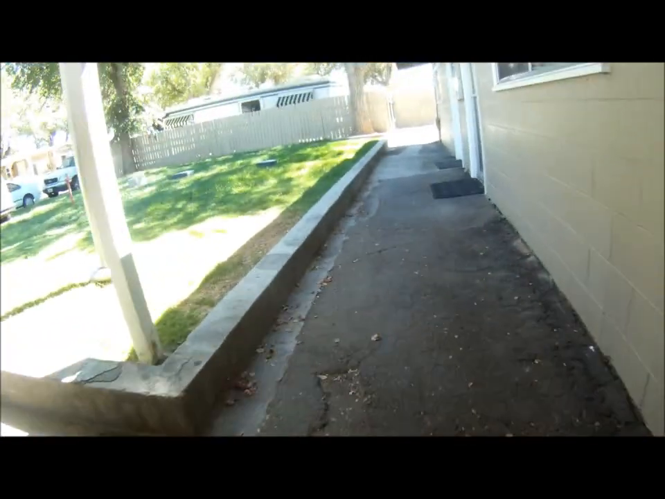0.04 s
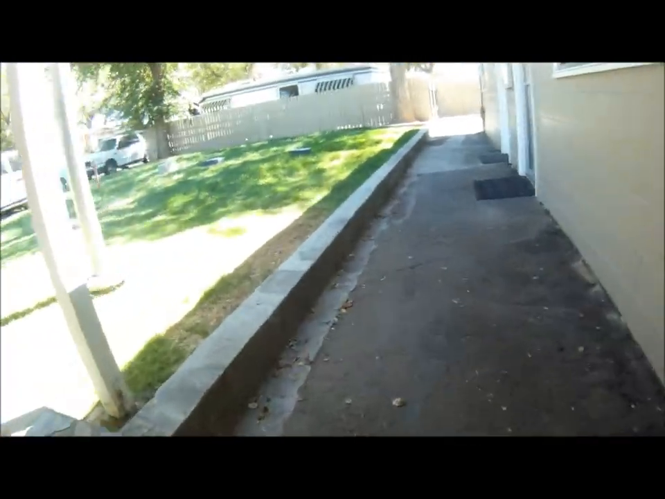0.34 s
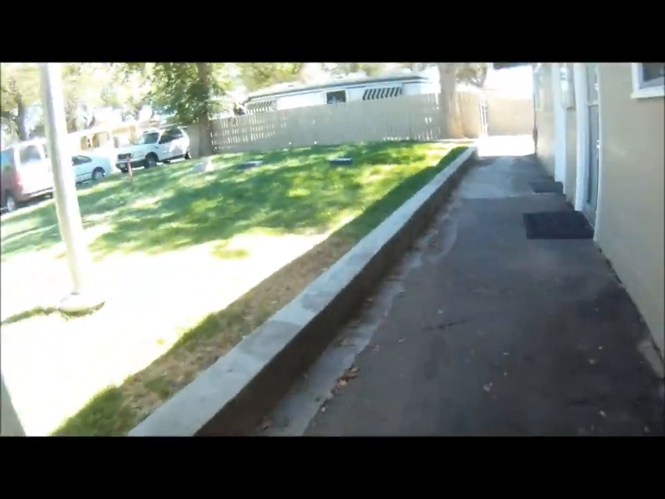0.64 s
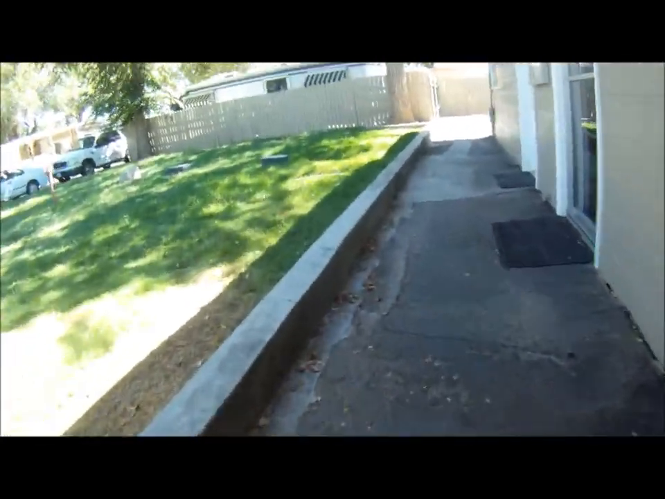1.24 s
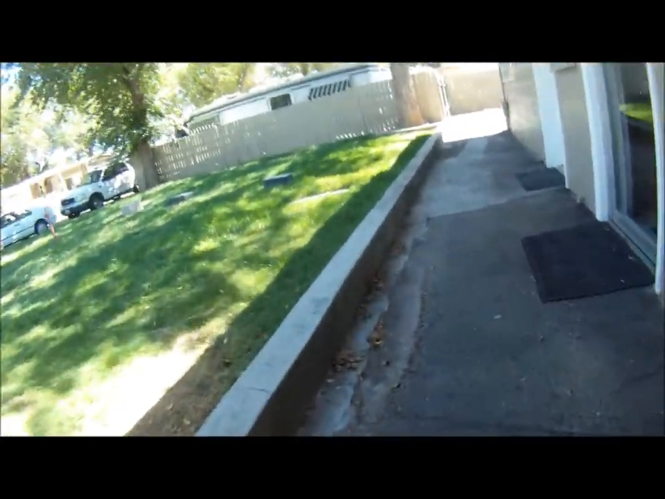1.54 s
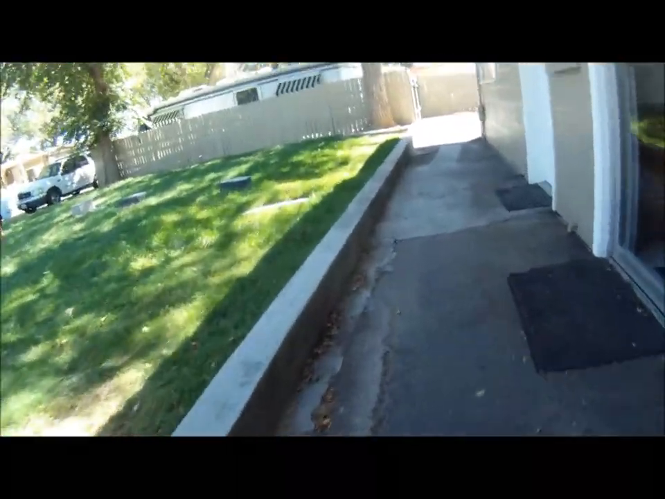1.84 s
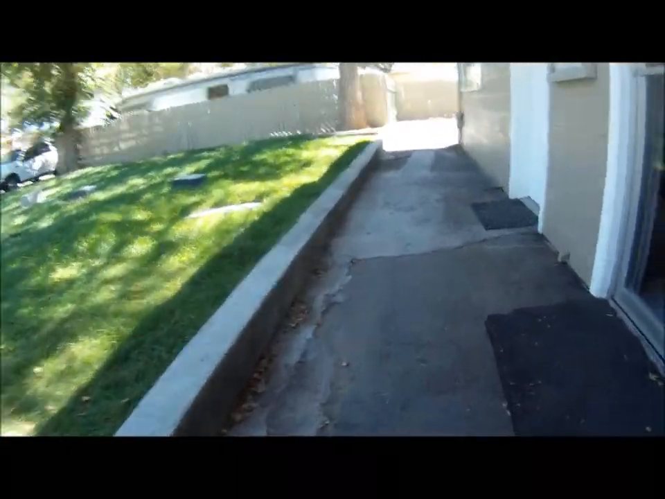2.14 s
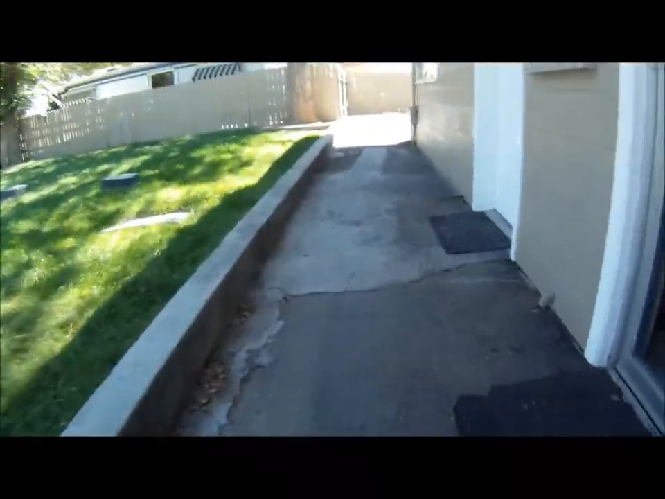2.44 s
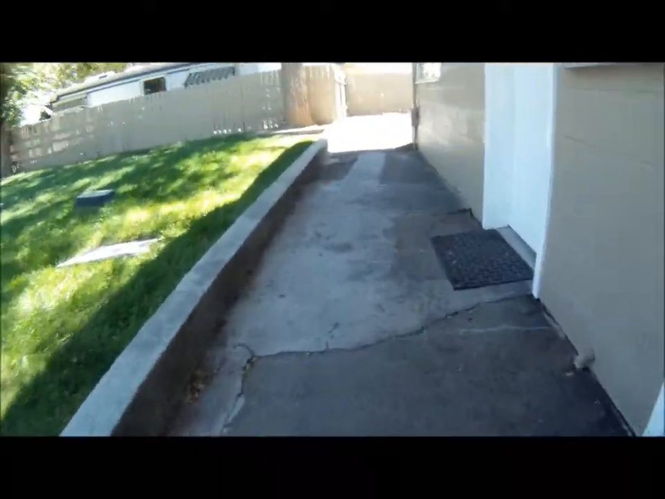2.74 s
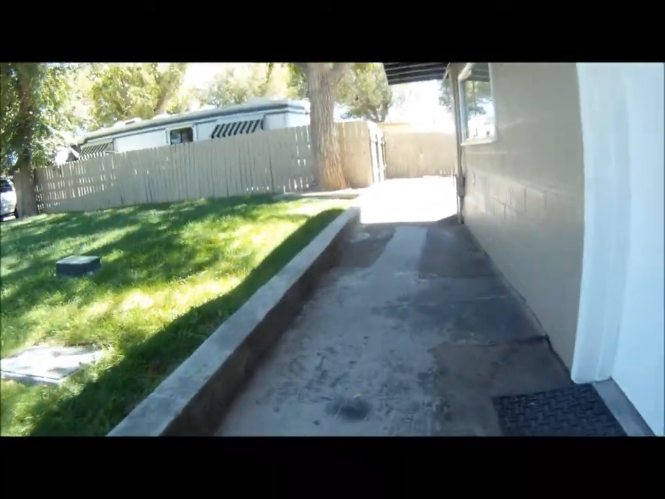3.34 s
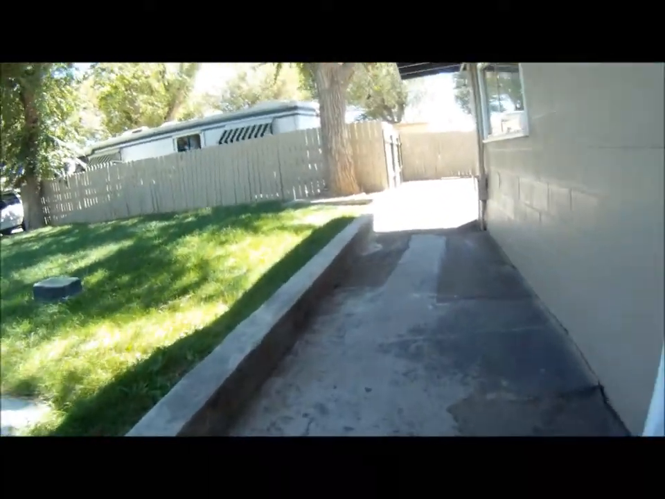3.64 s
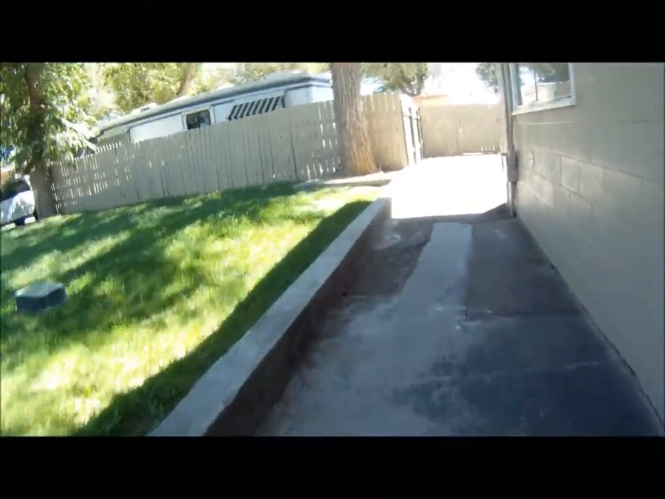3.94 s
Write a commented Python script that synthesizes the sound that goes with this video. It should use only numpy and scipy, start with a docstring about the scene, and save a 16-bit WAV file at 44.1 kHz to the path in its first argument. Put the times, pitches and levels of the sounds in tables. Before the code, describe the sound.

A powered wheelchair rolls along a rough concrete path outdoors, heard from on board. Its tyres crunch steadily on grit while cracks set off irregular rattles, metal clinks and a few hollow knocks, over a faint whine and low rumble.

```python
"""Grit crunches under the tyres of a powered wheelchair on rough, cracked concrete, heard from on board.
Cracks shake loose parts into short rattles and clinks, and the deeper ones give a hollow knock.
Crunch and rattles ring through the frame and housing; a lighter fitting chatters now and then.
One coarse stretch sets the frame droning, and the drive whines faintly over low rumble and outdoor air."""
import sys
import numpy as np
from scipy import signal
from scipy.fft import rfft, irfft
from scipy.io import wavfile

SR = 44100
rng = np.random.default_rng(int(sys.argv[2]) if len(sys.argv) > 2 else 0)


def put_to_file(sound):
    """Save the sound as 16-bit audio at rate SR, in the file named by the first command-line argument."""
    columns = np.atleast_2d(sound).T  # one column per channel
    safe = np.clip(columns, -1, 1)
    whole_steps = np.round(safe * 32767)
    wavfile.write(sys.argv[1], SR, whole_steps.astype(np.int16))


N = 176400
T = np.arange(N) / SR

# How rough the ground feels. Each row: time in seconds, tyre level in dB.
GROUND_ROUGHNESS = [(0, -58), (.3, -60.5), (.62, -55), (.83, -60), (.91, -53.5), (1.05, -53.5),
                    (1.14, -57.5), (1.5, -58), (1.72, -61), (2.0, -58), (2.33, -58), (2.53, -51),
                    (2.68, -60.5), (2.92, -56.5), (3.22, -60.5), (3.44, -58.5), (3.54, -53.5),
                    (3.63, -58.5), (4, -57)]
# The EQ of the crunch. Each row: frequency in Hz, gain in dB.
TYRE_TONE = [(100, 5), (300, 1), (700, 1), (2300, -2), (5000, 4), (9500, -2), (15000, 3)]
GRIT_PER_S, GRIT_SPREAD_DB, JUDDER_DB = 3000, 1.5, 1.5
def tyres():
    """Grit is crushed under the juddering wheels, louder on rough ground."""
    ground_db, = in_time(GROUND_ROUGHNESS)
    grit = impacts(GRIT_PER_S, GRIT_SPREAD_DB) * from_db(ground_db + JUDDER_DB * drift(hz=30.7))
    return grit.std() * colour(grit, TYRE_TONE, through_body=True)


# Jolts at cracks and stones. Each row: start in seconds, rattle level in dB, length in seconds,
# ring pitch in Hz, thud level in dB.
RATTLES = [(0.043, -56, 0.042, 2490, -70), (0.244, -58, .018, 2360, -72), (0.521, -52, 0.019, 2080, -63.5),
           (0.595, -58.5, 0.015, 2100, -67), (0.714, -54.5, 0.023, 2290, -59.5),
           (0.927, -48.5, 0.016, 2090, -72), (0.967, -50, .017, 2800, -52),
           (1.019, -51.5, 0.0088, 2280, -72), (1.042, -52, 0.01, 2140, -50.5),
           (1.202, -54.5, 0.012, 2070, -73), (1.306, -54, 0.0061, 2420, -55.5),
           (1.969, -55.5, .0076, 2150, -60.5), (2.148, -49.5, 0.0076, 2380, -55),
           (2.21, -47.5, 0.0097, 2130, -56.5), (2.367, -48, 0.021, 2850, -57),
           (2.428, -52.5, .007, 2800, -75), (2.456, -46, 0.015, 2600, -49.5), (2.494, -47, .013, 2680, -50),
           (2.54, -48, 0.014, 2540, -51.5), (2.573, -51, 0.0082, 2560, -62), (2.624, -55, 0.013, 2250, -80),
           (3.319, -56.5, 0.01, 2360, -65), (3.471, -54.5, 0.0072, 2120, -74),
           (3.542, -51.5, 0.01, 2340, -58), (3.674, -49.5, 0.021, 2505, -58),
           (3.748, -56.5, 0.022, 2050, -80), (3.929, -49, 0.026, 2020, -58.5)]
# A bright EQ for the rattle, a dull one for the thud. Each row: frequency in Hz, gain in dB.
RATTLE_TONE = [(150, -17.5), (1100, -6), (2000, 0.5), (3200, 7), (9000, 4), (15000, 10)]
THUD_TONE = [(40, -17.5), (120, 0.5), (380, -5), (1200, 1.5), (2000, -10.5), (6000, -69)]
CONTACTS_PER_S, CONTACT_SPREAD_DB, RING_GAIN = 5000, -0.5, 1.9
def rattles():
    """Each jolt thuds through the frame and sets loose parts buzzing round a pitch of their own."""
    contacts = impacts(CONTACTS_PER_S, CONTACT_SPREAD_DB)
    pushes = rng.standard_normal(N)
    buzz, ring, thud = 0, 0, 0
    for start, db, length, hz, thud_db in RATTLES:
        shake = burst(contacts, start, db, length, decay_s=.011)
        buzz += shake
        ring += resonate(shake, hz, width_hz=61)
        thud += burst(pushes, start, thud_db, length, decay_s=.018)
    loose_parts = buzz.std() * colour(buzz + RING_GAIN * ring, RATTLE_TONE, through_body=True)
    return loose_parts + thud.std() * colour(thud, THUD_TONE, through_body=True)


# Single metal accents. Each row: start in seconds, ring peak in dB, pitch in Hz.
CLINKS = [(.054, -46, 2120), (.526, -48, 2140), (.648, -43, 2130), (1.207, -54, 2070), (2.459, -46.5, 2340),
          (2.471, -43.5, 3070), (2.5, -47, 2220), (2.511, -46, 2800), (2.547, -48, 2320),
          (3.102, -53, 2210), (3.471, -48, 2130)]
RING_DECAY_S, CLACK_DECAY_S, CLACK_DB = .0075, .0019, -9
def clinks():
    """A metal part is struck once: a sharp clack through the frame, then a brief ring."""
    contacts = impacts(CONTACTS_PER_S, CONTACT_SPREAD_DB)
    clack, ring = 0, 0
    for start, db, hz in CLINKS:
        age = np.maximum(T - start, 0)
        strike = from_db(db + CLACK_DB) * (T > start) * np.exp(-age / CLACK_DECAY_S)
        clack += strike.std() * rms_one(contacts * strike)
        ring += from_db(db) * np.sin(2 * np.pi * hz * age) * np.exp(-age / RING_DECAY_S)
    return ring + clack.std() * colour(clack, RATTLE_TONE, through_body=True)


# Cues for the light fitting. Each row: start in seconds, level in dB, length in seconds.
CHATTERS = [(.852, -50, .012), (1.332, -57, .008), (1.565, -50.5, .013), (1.583, -52.5, .01),
            (2.245, -56.5, .009), (2.301, -51.5, .005), (2.773, -56.5, .017), (3.126, -54, .025),
            (3.408, -55, .006), (3.778, -50.5, .021)]
# Its thin, peaky EQ. Each row: frequency in Hz, gain in dB.
CHATTER_TONE = [(300, -7), (1400, -5), (1900, 2.5), (2400, 0), (3000, -7), (3900, 1.5), (4600, -11),
                (6000, -23), (7300, -15), (8150, -3.5), (9100, -15), (9800, -11), (12300, -34),
                (14200, -16)]
def fitting():
    """A light fitting chatters in short runs of contacts that stop abruptly."""
    contacts = impacts(per_s=2200, spread_db=2.5)
    chatter = sum(burst(contacts, start, db, length, decay_s=.0033) for start, db, length in CHATTERS)
    return chatter.std() * colour(chatter, CHATTER_TONE)


# Hits at the deeper cracks. Each row: start in seconds, level in dB, pitch in Hz.
KNOCKS = [(1.772, -61, 368), (2.147, -59.5, 386), (3.677, -57, 364), (3.929, -52.5, 307)]
def knocks():
    """A deep crack jolts the chair, which answers with one hollow note."""
    pushes = rng.standard_normal(N)
    notes = 0
    for start, db, hz in KNOCKS:
        jolt = burst(pushes, start, db, length_s=.02, decay_s=.02)
        notes += jolt.std() * rms_one(resonate(jolt, hz, width_hz=140))
    return notes


# The swell over the coarse stretch. Each row: time in seconds, level in dB.
DRONE_SWELL = [(.86, -79), (.895, -52.5), (1.06, -63.5), (1.13, -57), (1.4, -90)]
# Its hollow EQ. Each row: frequency in Hz, gain in dB.
DRONE_TONE = [(150, -16), (450, -11.5), (950, -16.5), (1120, -1), (1300, -8.5), (1700, -44)]
def frame_drone():
    """Coarse concrete keeps the frame ringing."""
    db, = in_time(DRONE_SWELL)
    return from_db(db) * colour(impacts(GRIT_PER_S, GRIT_SPREAD_DB), DRONE_TONE)


# The whine's lower tone. Each row: time in seconds, pitch in Hz, level in dB.
WHINE = [(0, 3380, -84), (.17, 3455, -70.5), (.4, 3520, -78), (.81, 3570, -74), (.95, 3680, -67),
         (1.14, 3530, -76), (1.39, 3605, -72), (1.42, 3565, -63), (1.475, 3565, -64.5), (1.53, 3650, -74),
         (1.6, 3590, -65.5), (1.645, 3580, -64.5), (1.69, 3620, -75), (1.83, 3650, -77), (1.9, 3580, -64.5),
         (1.97, 3615, -70), (2.07, 3597, -67.5), (2.25, 3660, -70), (2.68, 3585, -72), (2.86, 3640, -76),
         (2.9, 3660, -66), (2.97, 3595, -70), (3.4, 3640, -84)]
PITCH_SUM_HZ, UPPER_TONE_DB, FLUTTER_DB = 12005, -7, 2.0
def drive():
    """The drive whines in two thin tones; the upper one falls as the lower one rises."""
    hz, db = in_time(WHINE)
    wobble = .0006 * from_db(db.max() - db)  # steady when strong, wavering when weak
    hz = hz * (1 + wobble * drift(hz=40))
    lower, upper = (np.sin(2 * np.pi * np.cumsum(pitch) / SR) for pitch in (hz, PITCH_SUM_HZ - hz))
    amplitude = np.sqrt(2) * from_db(db + FLUTTER_DB * drift(hz=30))
    return amplitude * (lower + from_db(UPPER_TONE_DB) * upper)


# The low end. Each row: frequency in Hz, gain in dB.
RUMBLE_TONE = [(4, -7), (11, 0), (24, -3.5), (45, -13.5), (80, -20.5), (130, -28.5), (700, -57)]
def rumble():
    """The shaking chair makes a steady, deep rumble."""
    return from_db(-50.5) * colour(rng.standard_normal(N), RUMBLE_TONE)


# The background bed. Each row: frequency in Hz, gain in dB.
AIR_TONE = [(50, -3.5), (800, -12.5), (2000, -14.5), (5000, -40)]
def outdoor_air():
    """A soft, steady hiss in the centre."""
    return from_db(-66) * colour(rng.standard_normal(N), AIR_TONE)


# The EQ of the stereo sides. Each row: frequency in Hz, gain in dB.
SIDE_TONE = [(30, -26), (500, 0.5), (2500, -7), (5500, -3.5), (10000, -28)]
def side_noise():
    """A very faint noise of opposite sign in left and right adds slight width."""
    return from_db(-81) * colour(rng.standard_normal(N), SIDE_TONE) * np.array([[1], [-1]])


# The broad voice of frame and housing. Each row: frequency in Hz, gain in dB.
BODY_TONE = [(100, 1), (280, -4), (400, -3.5), (640, -9), (1000, -10), (1280, -6.5), (1550, -15),
             (1920, -9.5), (2200, -2.5), (2750, -7.5), (3350, -11.5), (3800, -10.5), (4200, -20.5),
             (6500, -21.5), (7900, -21), (8800, -17), (9850, -12.5), (10250, -24.5), (12100, -39.5),
             (13750, -33), (14100, -19), (15300, -25)]
# Their resonances and one notch. Each row: centre in Hz, width in Hz, gain in dB.
BODY_RESONANCES = [(217, 18, 8), (860, 90, 4), (1170, 120, 8), (2085, 130, 7), (2330, 45, 3), (2544, 40, 4),
                   (2670, 25, 4), (3690, 140, 2.5), (4720, 500, 4.5), (6020, 330, -12), (7330, 400, 4),
                   (8340, 190, 7), (10830, 180, 9), (13180, 220, 12)]
def colour(x, tone, through_body=False):
    """Apply an EQ and, optionally, the ringing of frame and housing; unit power."""
    size = 2 * N
    hz = np.maximum(np.arange(N + 1) * SR / size, 1)
    db = 0
    for curve in [tone, BODY_TONE] if through_body else [tone]:
        points_hz, points_db = np.transpose(curve)
        db += np.interp(np.log(hz), np.log(points_hz), points_db)
    if through_body:
        for centre, width, lift in BODY_RESONANCES:
            db += lift / (1 + (2 * (hz - centre) / width) ** 2)
    cepstrum = irfft(np.log(from_db(db)))
    response = np.exp(rfft(2 * cepstrum[:N], size))  # minimum phase: the ring follows the hit
    return rms_one(irfft(rfft(x, size) * response)[:N])


def impacts(per_s, spread_db):
    """Tiny random impacts of uneven size; unit power."""
    sizes = from_db(spread_db * np.minimum(rng.exponential(1, N), 4)) * rng.choice([-1, 1], N)
    return rms_one(sizes * (rng.random(N) < per_s / SR))


def burst(source, start, db, length_s, decay_s, attack_s=.0035):
    """Shape a source so it starts quickly, holds and dies away."""
    age = T - start
    envelope = np.clip(age / attack_s, 0, 1) * np.exp(-np.clip((age - length_s) / decay_s, 0, 20))
    return from_db(db) * envelope.std() * rms_one(source * envelope)


def resonate(x, hz, width_hz):
    """One resonance, gain 1 at its top."""
    r = np.exp(-np.pi * width_hz / SR)
    feedback = [1, -2 * r * np.cos(2 * np.pi * hz / SR), r * r]
    return signal.lfilter(np.array([1, 0, -1]) * (1 - r * r) / 2, feedback, x + 1e-18)


def drift(hz):
    """A smooth random wander, mostly slower than hz; unit power."""
    r = np.exp(-2 * np.pi * hz / SR)
    return rms_one(signal.lfilter([1], [1, -2 * r, r * r], rng.standard_normal(N + SR))[SR:])


def in_time(rows):
    """Each column of an automation curve, at every sample."""
    seconds, *columns = np.transpose(rows)
    return [np.interp(T, seconds, column) for column in columns]


def from_db(db):
    """Decibels to gain."""
    return 10 ** (np.asarray(db) / 20)


def rms_one(x):
    """Scale to unit power."""
    return x / np.sqrt(np.mean(x ** 2) + 1e-20)


def scene():
    """The chair sits dead centre, over a faint hiss."""
    chair = tyres() + rattles() + clinks() + fitting() + knocks() + frame_drone() + drive() + rumble()
    return chair + outdoor_air() + side_noise()


def record(dry, cutoff_hz=15300):
    """A steep low-pass takes off the very top."""
    return signal.sosfilt(signal.ellip(12, .2, 80, cutoff_hz, fs=SR, output="sos"), dry)


dry = scene()
out = record(dry)
put_to_file(out)
```